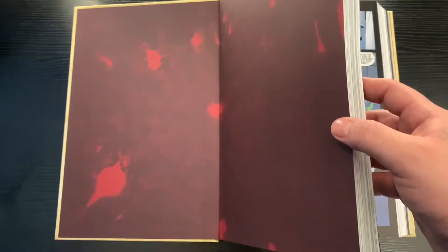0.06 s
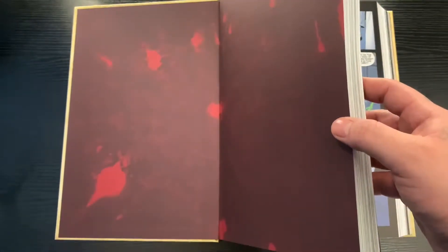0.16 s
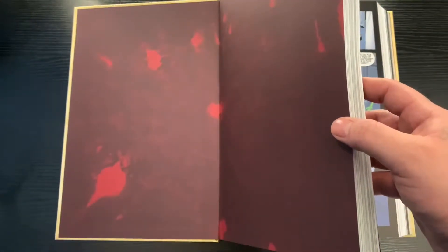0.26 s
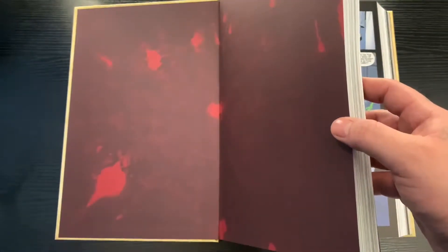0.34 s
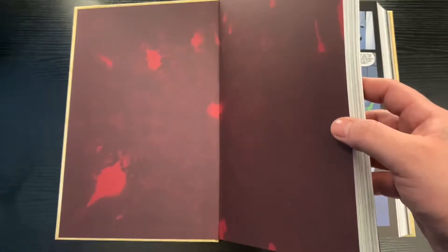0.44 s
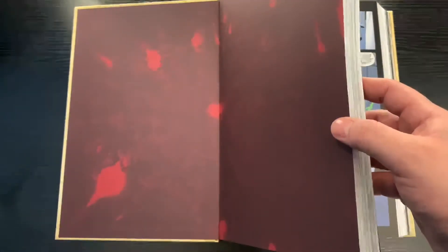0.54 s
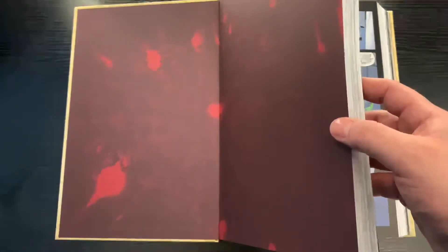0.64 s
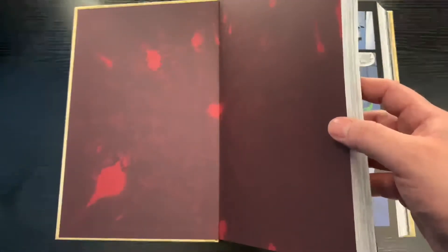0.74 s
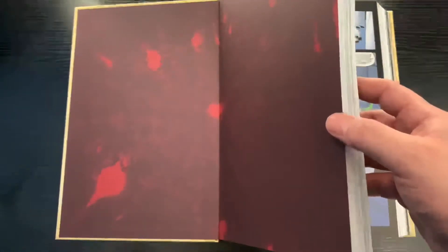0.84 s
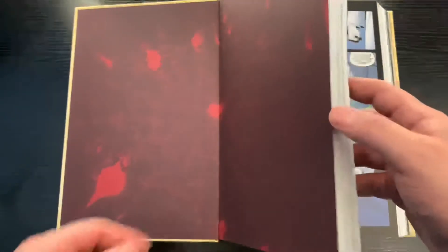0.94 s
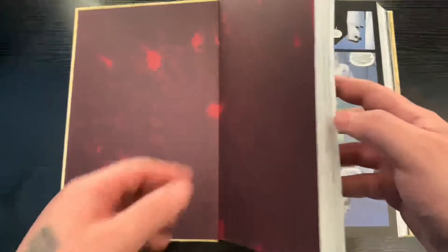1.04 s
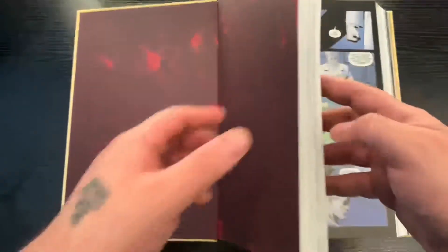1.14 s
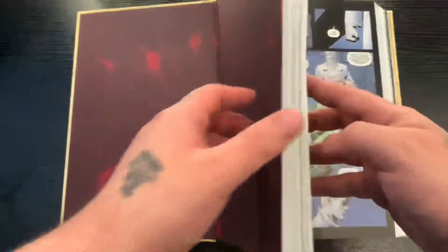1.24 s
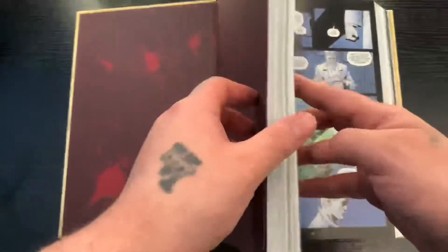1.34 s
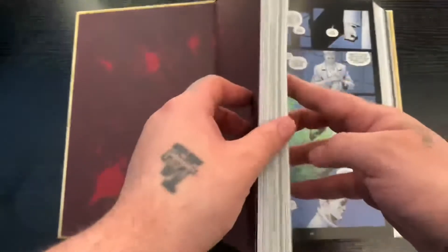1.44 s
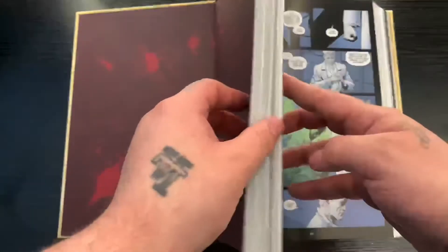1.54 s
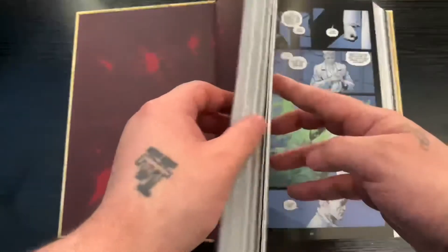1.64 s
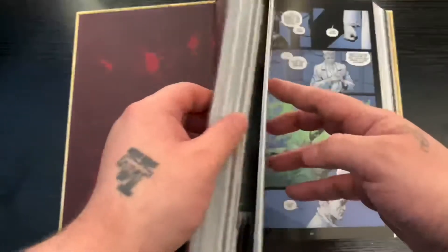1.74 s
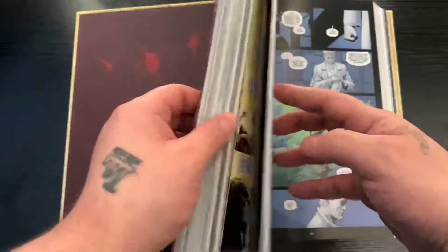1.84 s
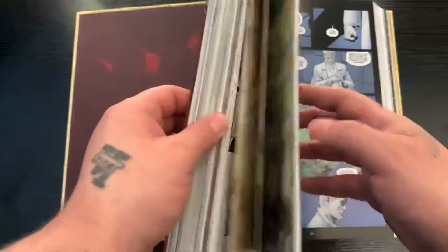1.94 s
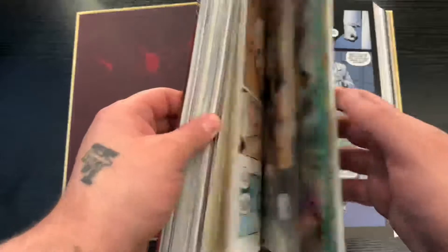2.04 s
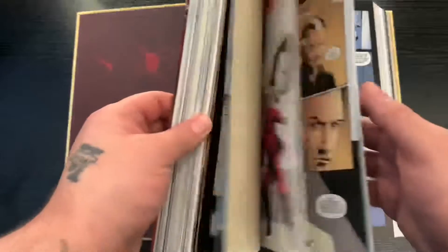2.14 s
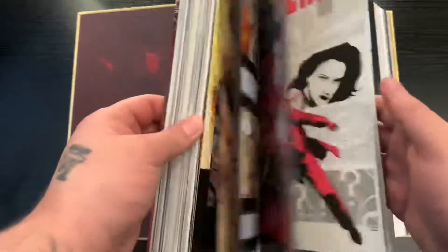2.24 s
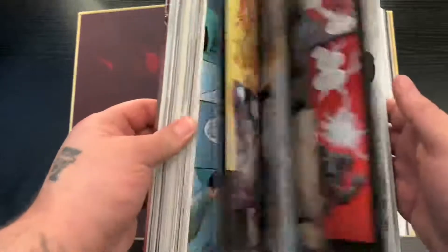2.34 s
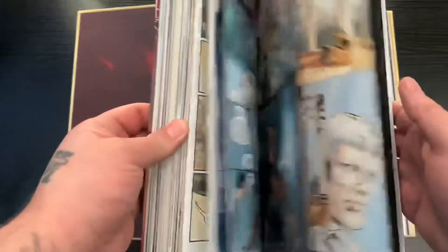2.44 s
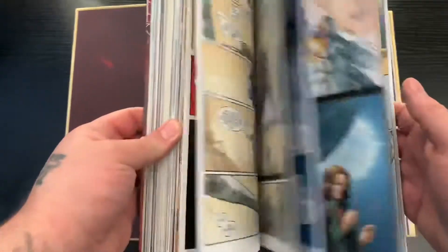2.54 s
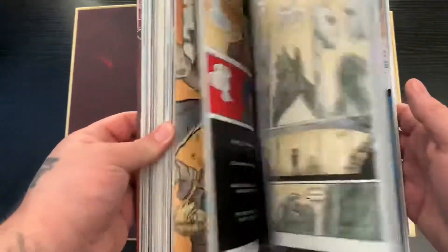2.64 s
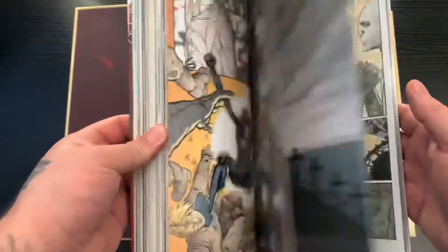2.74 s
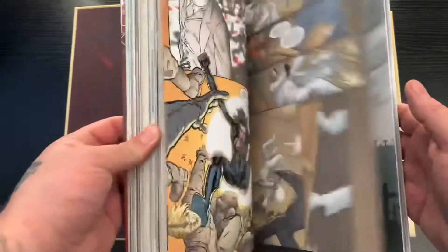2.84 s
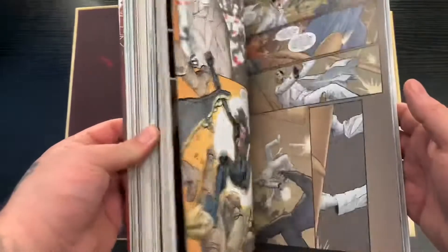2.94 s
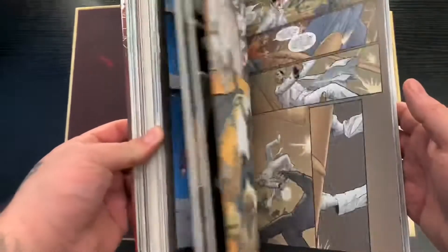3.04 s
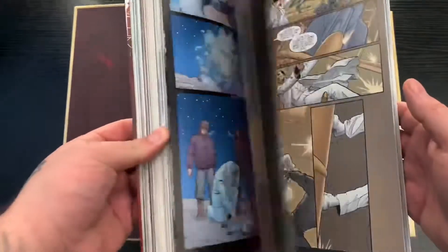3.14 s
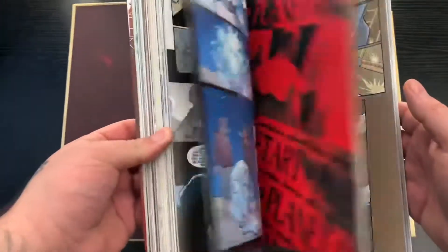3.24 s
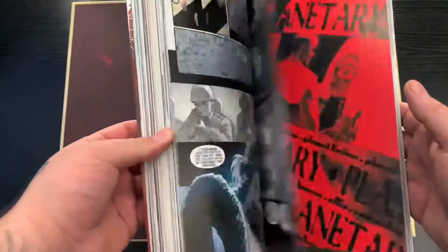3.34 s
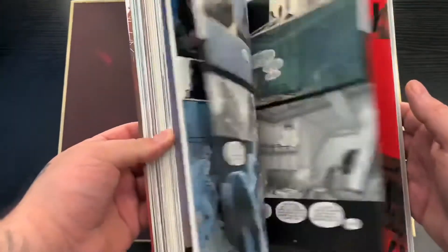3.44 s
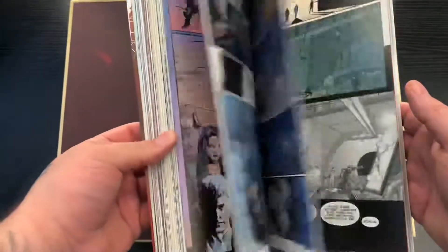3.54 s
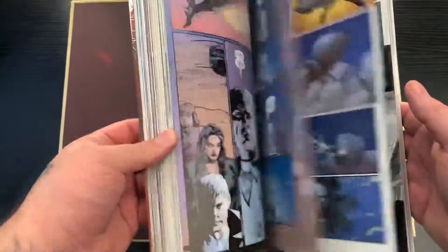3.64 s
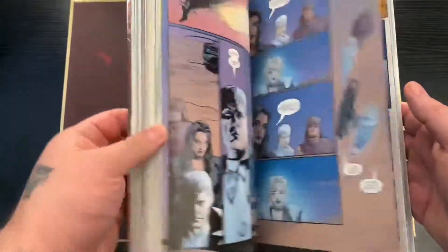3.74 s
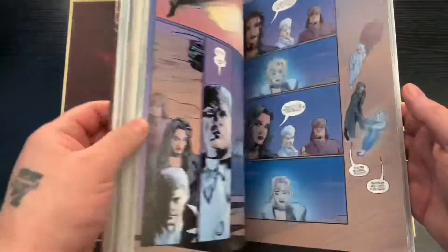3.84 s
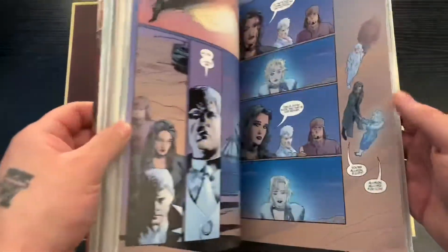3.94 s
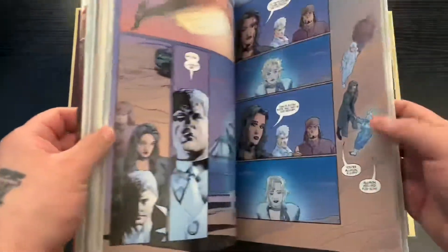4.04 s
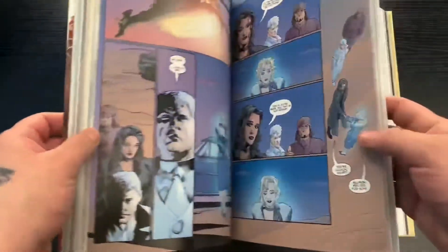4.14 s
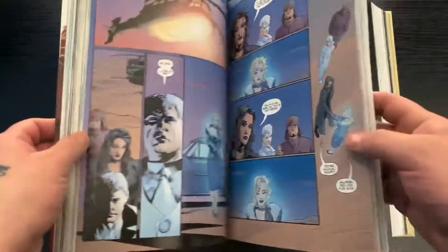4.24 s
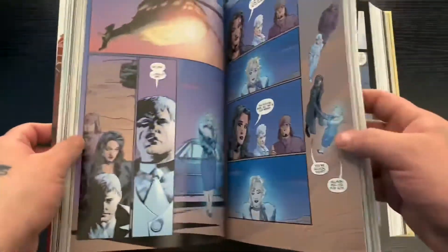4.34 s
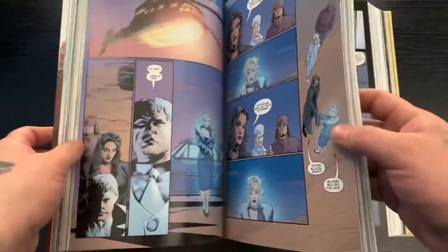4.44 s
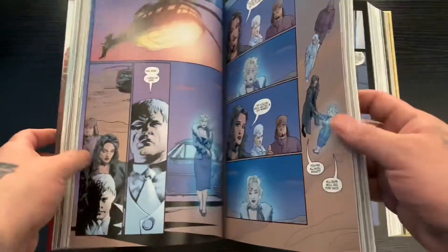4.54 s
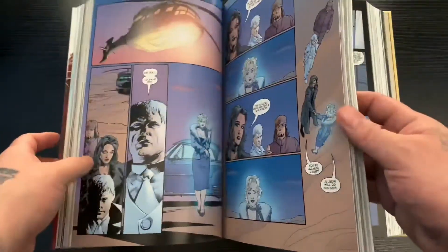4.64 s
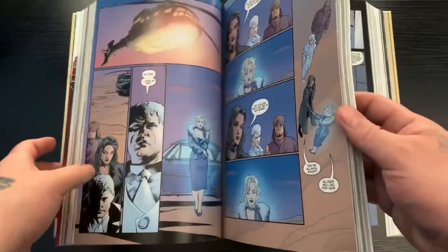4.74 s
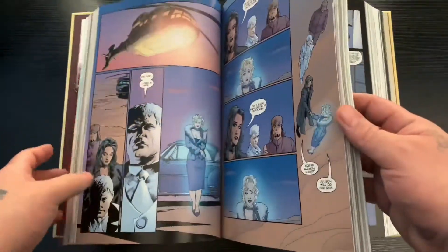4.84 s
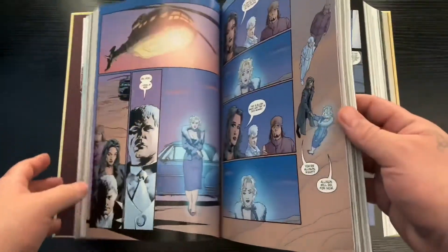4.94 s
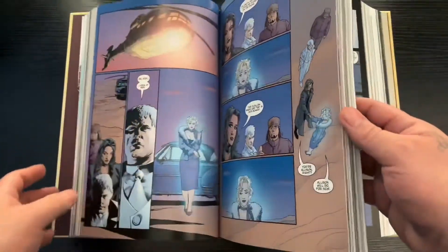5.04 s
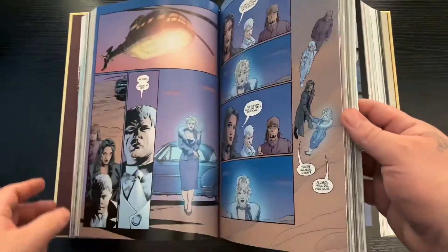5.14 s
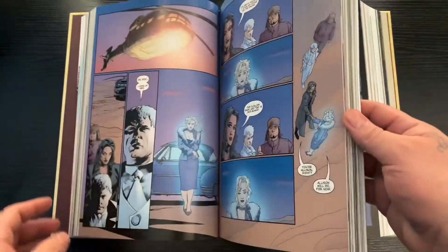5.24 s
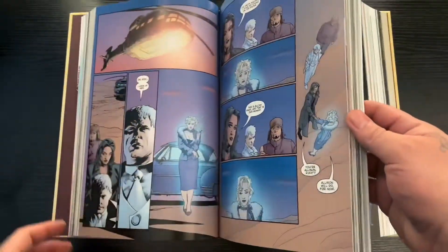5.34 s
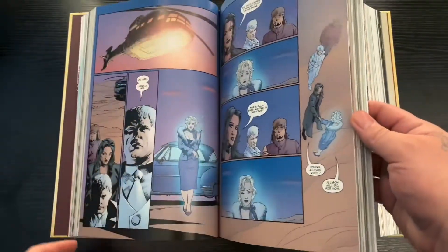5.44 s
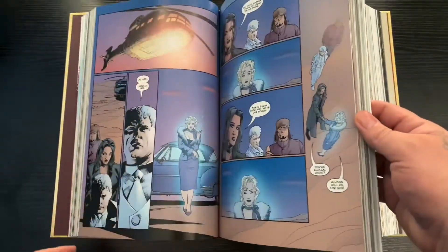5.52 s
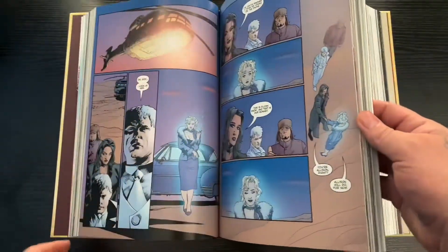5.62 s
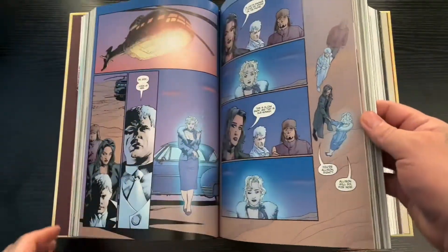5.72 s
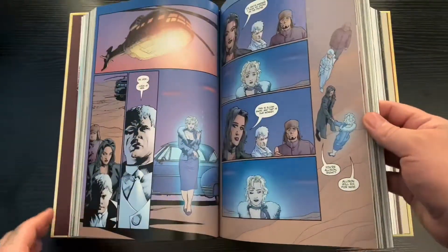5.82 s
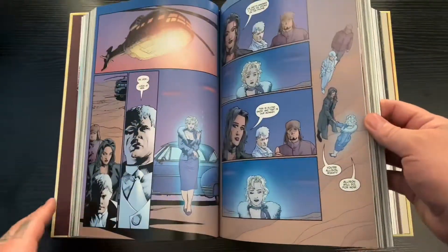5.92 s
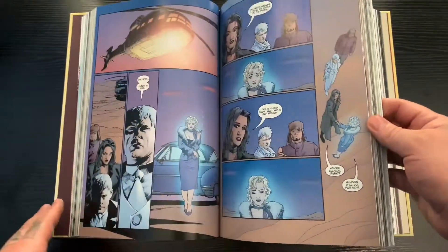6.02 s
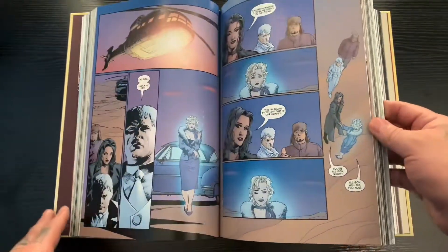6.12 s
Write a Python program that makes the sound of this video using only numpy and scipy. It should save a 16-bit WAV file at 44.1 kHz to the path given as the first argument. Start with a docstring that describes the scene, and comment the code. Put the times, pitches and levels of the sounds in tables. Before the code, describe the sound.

Low fan hum and soft room air come first. A hardcover raps the desk, hollow and dry with loose pages shuddering. Bright, irregular page flicks run together, thin out, and end in one loud whip-like crack. The book then lands in bumpy knocks, paper hisses under the hands, a brief low stuttering rub settles it, and faint finger touches follow. Close microphone, small room, short reverberation.

```python
"""In a small, quiet room, a thick hardcover comic is leafed through on a wooden desk.
The stiff cover knocks on the desk: decaying modes of the wood, a dry crack and a shudder of loose pages.
Glossy pages flick off the thumb as short noise bursts with a ring, and land with soft puffs of air.
Sheets slide with coloured noise, and the page block settles with a short stick-slip rub that falls in pitch.
A fan hums faintly: wavering sines and narrow noise peaks over soft air noise."""
import sys
import numpy as np
from scipy import signal
from scipy.fft import rfft, irfft, next_fast_len
from scipy.io import wavfile

SR = 44100
rng = np.random.default_rng(int(sys.argv[2]) if len(sys.argv) > 2 else 0)


def materialize(psi):
    """Save the field psi as 16-bit PCM at rate SR to the path in sys.argv[1].

    A 1-D psi becomes a single channel; in a 2-D psi each row is a channel.
    """
    bounded = np.clip(np.atleast_2d(psi).T, -1, 1)
    quanta = np.round(bounded * 32767).astype(np.int16)
    wavfile.write(sys.argv[1], SR, quanta)


N = 272538
TIME = np.arange(N) / SR
CUTOFF_HZ = 16000

# page edges leaving the thumb: start_s, level_db, ring_hz, earlier_catches (rounded to a whole number)
PAGE_FLICKS = [(1.784, -63, 7400, 0), (1.8405, -56, 7400, 0), (1.864, -63, 9000, 0),
               (1.954, -54, 4580, 1.5), (1.9645, -45.5, 4660, 0), (1.969, -46, 6900, 0),
               (2.027, -65, 5000, 0), (2.058, -50, 4700, 0.5), (2.069, -46.5, 5030, 0),
               (2.109, -54, 5500, 0), (2.147, -56, 5500, 1.5), (2.158, -43.5, 6500, 0),
               (2.211, -51, 11300, 0), (2.224, -48, 4500, 0), (2.238, -49.5, 7300, 0),
               (2.253, -42, 6070, 2), (2.294, -55, 4000, 0), (2.3051, -46, 5300, 0),
               (2.3365, -50, 6800, 0.5), (2.3462, -44, 7200, 0), (2.43, -48, 2790, 1.5),
               (2.439, -54, 6500, 0), (2.4524, -40, 10800, 0), (2.5082, -48, 5500, 0),
               (2.516, -50, 4700, 0.5), (2.5254, -43.5, 4710, 1), (2.73, -47, 6800, 0),
               (2.745, -59, 7000, -0.5), (2.757, -52, 4800, 0.5), (2.77, -66, 3200, 0),
               (2.831, -55, 10100, 0), (2.837, -56, 6800, 0), (2.9056, -47.5, 4140, 3),
               (3.032, -68, 9900, 0), (3.088, -58, 5000, 0.5), (3.109, -48, 4550, 0),
               (3.2596, -32, 9900, 0), (3.2936, -38.5, 6700, 0.5), (3.348, -48.5, 11500, 0.5)]


def from_db(db):
    """Decibels to amplitude ratio: 20 dB per factor of ten."""
    return 10 ** (np.asarray(db) / 20)


def rms_one(x):
    """Normalization to unit mean power."""
    return x / np.sqrt(np.mean(x ** 2) + 1e-20)


def at_hz(points, hz, axis=1):
    """Linear interpolation of a table column along logarithmic frequency."""
    points = np.array(points)
    return np.interp(np.log(np.maximum(hz, 1)), np.log(points[:, 0]), points[:, axis])


def butter(x, hz, kind, order=2):
    """Causal filtering with a maximally flat (Butterworth) passband."""
    return signal.sosfilt(signal.butter(order, hz, kind, fs=SR, output="sos"), x + 1e-18)


def flutter(per_s):
    """Random modulation: lines joining Gaussian knots of spread 1; the last of 4096 knots is held."""
    knots = rng.standard_normal(4096)
    return np.interp(TIME * per_s, np.arange(len(knots)), knots)


def noise(spectrum, size=N):
    """Diffuse-field noise: shaped stereo noise of rms 1 whose ears agree most in the bass."""
    # left-right likeness of diffuse sound: frequency_hz, correlation
    likeness = [(60, 0.99), (130, 0.78), (290, 0.64), (640, 0.081), (1400, 0), (16000, 0)]
    padded = next_fast_len(size, True)
    hz = np.fft.rfftfreq(padded, 1 / SR)
    alike = np.clip(at_hz(likeness, hz), -1, 1)
    mid, side = rfft(rng.standard_normal((2, padded)))
    bass_cut = np.minimum(hz / spectrum[0][0], 1) ** 2
    gain = from_db(at_hz(spectrum, hz)) * bass_cut
    stereo = np.sqrt(1 + alike) * mid + np.sqrt(1 - alike) * side * [[1], [-1]]
    return rms_one(irfft(gain * stereo, padded)[:, :size])


def place(x, lag_s, pan_db):
    """Localization by interaural time and level: lag_s delays the right, pan_db is left minus right."""
    right = np.interp(TIME - lag_s, TIME, x)
    return np.array([x * from_db(pan_db / 2), right * from_db(-pan_db / 2)])


def envelope(start_s, length_s, attack_s, release_s):
    """Linear attack, steady hold, then exponential decay by 1/e per release_s."""
    age = TIME - start_s
    return np.clip(age / attack_s, 0, 1) * np.exp(-np.clip((age - length_s) / release_s, 0, 30))


def rippled(spectrum, ripple_db):
    """Bending resonances: a bent sheet adds narrow random peaks and dips to a colour."""
    grid = np.geomspace(spectrum[0][0], 16000, 110)
    level_db = at_hz(spectrum, grid) + ripple_db * rng.standard_normal(len(grid))
    return np.column_stack([grid, level_db])


def room_tone(air_db=-60.5, peak_half_width=0.022):
    """Broadband air noise, wavering fan tones and narrow resonances of the fan's housing."""
    # colour of the air noise: frequency_hz, density_db per Hz
    air = [(25, -22), (60, -3.5), (110, -10), (150, -12), (200, -14.5), (300, -16), (500, -22),
           (820, -25.5), (1150, -20), (1900, -31.5), (2900, -40.5), (6000, -50), (9500, -46),
           (16000, -50.5)]
    # fan tones: frequency_hz, level_db
    fan_tones = [(73, -72), (146, -66)]
    # housing resonances: frequency_hz, level_db
    housing_peaks = [(295, -73.5), (580, -76), (1130, -74), (1245, -82), (2080, -87.5)]
    waver = from_db(2 * flutter(14))
    hum = sum(np.sqrt(2) * from_db(db) * np.sin(2 * np.pi * hz * TIME + .5 * flutter(14))
              for hz, db in fan_tones)
    draught = noise(air)
    housing = 0
    for hz, db in housing_peaks:
        band_hz = [hz * (1 - peak_half_width), hz * (1 + peak_half_width)]
        housing = housing + from_db(db) * rms_one(butter(draught, band_hz, "band"))
    return from_db(air_db) * noise(air) + waver * hum + housing


def room(x, first_wall_s=0.0032):
    """Reverberation: diffuse reflections decay exponentially at a rate set for each band."""
    # reverberation: frequency_hz, level_db, t60_s
    decay = [(70, 4.5, 0.26), (130, 1, 0.35), (330, 4, 0.31), (530, -5, 0.12), (680, -1.5, 0.24),
             (1190, 0, 0.28), (4000, 3, 0.18), (14000, 0.5, 0.17)]
    size = SR // 2
    age = TIME[:size]
    white = noise([(20, 0), (20000, 0)], size=size)
    tail = 0
    edges = np.geomspace(50, 18000, 10)
    for low, high in zip(edges, edges[1:]):
        hz = np.sqrt(low * high)
        level_db = at_hz(decay, hz) - 60 * age / at_hz(decay, hz, axis=2)
        tail = tail + butter(white, [low, high], "band") * from_db(level_db)
    # silent until first_wall_s, full at twice that; unit energy
    tail = rms_one(tail * np.clip(age / first_wall_s - 1, 0, 1)) / np.sqrt(size)
    return signal.fftconvolve(x, tail, axes=1)[:, :N]


def walls(x):
    """Specular reflection: two near surfaces return discrete delayed echoes of the left signal."""
    # first reflections: delay_s, level_db, left_minus_right_db, right_lag_s
    reflections = [(.0182, -11.5, -3.5, 0.00041), (0.0292, -17, -3, 0.00052)]
    return sum(from_db(db) * place(np.interp(TIME - delay_s, TIME, x[0]), lag_s, pan_db)
               for delay_s, db, pan_db, lag_s in reflections)


def slide_level(follows, glossy, creep_db):
    """Friction noise grows with speed: power sum of strokes, page swishes and creep for one colour."""
    # bent pages creeping under the hands that hold them: time_s, level_db (before creep_db)
    creep = [(1.4, -71), (1.56, -75), (1.78, -71.5), (2.2, -68.5), (3.09, -83.5), (3.56, -92), (4.14, -66),
             (4.26, -66), (4.58, -69.5), (4.84, -72), (5.0, -63.5), (5.1, -92)]
    # strokes of paper on paper and under fingers: start_s, length_s, level_db (before follows),
    # gloss_db (before glossy), swell_share of the length
    strokes = [(0.745, .025, -80, -4, .5), (1.11, 0.15, -78.5, -6, 0.34), (1.458, 0.23, -92.5, -16, 0.55),
               (2.283, 0.028, -67, 6, .5), (2.743, 0.032, -69.5, -8, .4), (2.80, 0.11, -73.5, 0, 0.98),
               (3.648, 0.086, -75, -2, 0.64), (3.822, 0.065, -73.5, -20, 0.59),
               (3.915, 0.047, -78.5, -17, 0.69), (4.02, .21, -65.5, -5, 0.44),
               (4.293, 0.11, -64.5, -4, 0.73), (4.39, 0.049, -62.5, -1.5, 0.59),
               (4.526, 0.025, -56.5, 2.5, 0.73), (4.552, .065, -62.5, 0, 0.25), (4.63, 0.16, -75, 3, 0.47),
               (4.74, 0.046, -58, -4, 0.65), (4.789, 0.014, -51.5, -8, 0.52),
               (4.855, 0.074, -48.5, -1, 0.42), (4.953, 0.035, -59.5, 3, .6), (5.09, .078, -80.5, 12.5, .6),
               (6.05, .098, -81, 12, 0.48)]
    middling_db, release_s = -65.5, 0.023
    riffle_end_s = 2.53   # until then pages leave in close succession
    # each page brushes its neighbour as it leaves; swish_db is relative to its flick
    swish_db, lead_s, swish_s, swish_swell = -29.5, 0.045, 0.045, 0.75
    power = from_db(creep_db + np.interp(TIME, *np.transpose(creep), left=-200, right=-200)) ** 2
    swishes = [(s - lead_s, swish_s, db + swish_db, 0, swish_swell)
               for s, db, hz, catches in PAGE_FLICKS if s < riffle_end_s]
    for s, length_s, db, gloss_db, swell in strokes + swishes:
        peak = from_db(middling_db + follows * (db - middling_db) + glossy * gloss_db)
        power = power + (peak * envelope(s, length_s, swell * length_s, release_s)) ** 2
    return np.sqrt(power)


def fibres(level, spread_db=3.0, snags_per_s=260, grit_db=-3):
    """Asperity contact: single fibres snag at random, each impulse a fine grit in one band."""
    # band of the snagging fibres: low_hz, high_hz
    grit_hz = [3000, 6800]
    happens = rng.random(N) < snags_per_s / SR
    strength = from_db(spread_db * np.minimum(rng.exponential(1, N), 3))
    snags = happens * strength * rng.choice([-1, 1], N)
    rings = butter(butter(snags, grit_hz, "band"), grit_hz, "band")
    return from_db(grit_db) * level * place(rms_one(rings), lag_s=.0001, pan_db=-2.5)


def slides(brush_db=3, hiss_db=-1.46, sheen_db=-4.0, grain_db=2.5, patchy_db=1.5,
           ripple_db=4.0, bends_per_s=12):
    """Sliding friction: faster strokes are brighter, and the colour shifts as the sheets bend."""
    # low, middle and top colours of sliding paper: frequency_hz, density_db per Hz
    brush = [(400, 10), (700, 1.5), (1400, 4.5), (2500, -2), (3400, -12), (4500, -13.5), (7000, -38.5)]
    hiss = [(2500, -7.5), (3600, 1), (4400, 3), (5200, -0.5), (5900, -3), (7200, -1.5), (8500, -35),
            (11000, -24)]
    sheen = [(6500, -24), (8500, -6), (10200, -2.5), (11300, -6.5), (13400, -5), (14300, -16),
             (15600, -11.5)]
    speed = slide_level(0.92, glossy=0, creep_db=-12)
    brush_level = slide_level(0.35, glossy=-0.29, creep_db=-0.5)
    sheen_level = slide_level(1.25, glossy=1.0, creep_db=-7.0)
    out = fibres(speed)
    for colour, trim_db, level in [(brush, brush_db, brush_level), (hiss, hiss_db, speed),
                                   (sheen, sheen_db, sheen_level)]:
        bend = flutter(bends_per_s)
        paper = np.cos(bend) * noise(rippled(colour, ripple_db))
        paper = paper + np.sin(bend) * noise(rippled(colour, ripple_db))
        out = out + level * from_db(trim_db + patchy_db * flutter(60)) * paper
    return out * rms_one(from_db(grain_db * flutter(900)))


def rub(jitter=.21, body_hz=520, rough_db=1.5, release_s=0.0046):
    """Stick-slip oscillation: the sagging page block makes a sawtooth that slows as it comes to rest."""
    start_s, attack_s, length_s = 4.875, 0.012, 0.067
    start_db, fade_db_per_s = -42, 49
    fast_hz, slow_hz, slows_at_s, slowing_s = 420, 115.3, .029, 0.012   # slip rate before jitter
    age = np.maximum(TIME - start_s, 0)
    per_s = slow_hz + (fast_hz - slow_hz) * (1 - np.tanh((age - slows_at_s) / slowing_s)) / 2
    cycles = np.cumsum(per_s * np.exp(jitter * flutter(250))) / SR
    saw = rms_one(butter(cycles % 1 - .5, body_hz, "low", order=4))
    level = from_db(start_db - fade_db_per_s * age + rough_db * flutter(200))
    shape = envelope(start_s, length_s, attack_s, release_s)
    return place(saw * level * shape, lag_s=.00005, pan_db=-0.5)


def flaps(fall_s=0.0025):
    """Flat impact: a sheet meets the next all over at once, a brief slap of band-shaped noise."""
    # slaps of sheet on sheet: centre_s, level_db, centre_hz
    slaps = [(2.333, -39.5, 930), (2.433, -58, 2600), (2.527, -47, 895), (2.642, -52, 950),
             (2.769, -61, 1380), (2.850, -50, 1160)]
    out, size = np.zeros((2, N)), SR // 10
    for s, db, hz in slaps:
        first = int(s * SR) - size // 2
        span = slice(first, first + size)
        slap = noise([(hz / 2, -8), (hz, 0), (hz * 1.33, -9), (hz * 1.2, -24), (15000, -55)], size=size)
        out[:, span] += from_db(db) * slap / np.cosh((TIME[span] - s) / fall_s)
    return out


def puffs(skirt_db=-22, landing_rasp_db=-40, nearness=0.35, flap_db=3.5):
    """Air displacement: a landing or pressed page expels its air cushion, a hollow puff over a thud."""
    # pages landing: centre_s, level_db, centre_hz, thud_db against the puff
    page_landings = [(2.333, -41.5, 870, 7), (2.431, -48.5, 670, 11), (2.523, -39.5, 780, 7),
                     (2.634, -48, 600, 1), (2.767, -52, 590, 3), (2.837, -45, 590, 3),
                     (3.268, -42.5, 543, 7), (3.459, -57, 330, 3.5), (3.643, -57.5, 340, -5),
                     (3.719, -60, 710, 5)]
    # fingers pressing: centre_s, level_db, centre_hz, half_length_s, thud_db and rasp_db against the puff
    touches = [(4.551, -45, 704, 0.0095, -6, -22), (4.831, -53, 485, .0078, -1, -28),
               (4.884, -50, 794, 0.012, -7, -22), (5.648, -54.5, 330, 0.0074, -15, -22),
               (5.845, -65.5, 650, 0.017, -1, -17), (6.17, -53, 430, 0.021, -5, -35)]
    hardest_half_s, doubling_db = 0.011, 15   # a landing doubling_db softer lasts twice as long
    touch_skirt_db = -9.5   # skin on paper is brighter than a cushion of air
    rasp_hz = 3030   # fingertip on a page edge
    out, size = np.zeros((2, N)), SR // 4
    hardest_db = max(row[1] for row in page_landings)
    events = []
    for s, db, hz, thud_db in page_landings:
        half_s = hardest_half_s * 2 ** ((hardest_db - db) / doubling_db)
        events.append((s, db, hz, half_s, thud_db, skirt_db, landing_rasp_db))
    for s, db, hz, half_s, thud_db, rasp_db in touches:
        events.append((s, db, hz, half_s, thud_db, touch_skirt_db, rasp_db))
    for s, db, hz, half_s, thud_db, top_db, rasp_db in events:
        first = int(s * SR) - size // 2
        span = slice(first, min(first + size, N))
        colour = [(70, thud_db), (hz * 0.33, -8), (hz, 0), (hz * 1.24, -7), (hz * 1.85, top_db),
                  (rasp_hz, rasp_db), (5000, -42), (15000, -60)]
        air = noise(colour, size=size)
        air = rms_one(air + nearness * air[::-1])   # close by, so both ears hear much the same
        shape = 1 / np.cosh(1.36 * (TIME[span] - s) / half_s)
        out[:, span] += from_db(db) * air[:, :span.stop - first] * shape
    return out * rms_one(from_db(flap_db * flutter(300)))   # the sheet flaps, so air leaves unevenly


def whip(pan_db=0.0):
    """Impulsive release: a stiff sheet whips taut, a sudden broad crack that decays exponentially."""
    # the whip: start_s, level_db, fall_s to 1/e
    release = (3.2598, -25, 0.0027)
    # colour of its crack: frequency_hz, density_db per Hz
    colour = [(400, 3), (1000, -0.5), (2000, -2.5), (3400, 1.5), (4700, 1), (7000, -6), (8700, 3),
              (10500, 0.5), (15000, -9)]
    s, db, fall_s = release
    shape = (TIME > s) * np.exp(-np.abs(TIME - s) / fall_s)
    return from_db(db) * shape * noise(colour) * from_db([[pan_db / 2], [-pan_db / 2]])


def crackle(spread_db=2.5, low_hz=2800, high_hz=7200, width=0.2, count=8):
    """Random buckling: a leaving page unbends in tiny snaps, each ringing in one of several bands."""
    level_db, per_s = -21, 1000   # level relative to the flick
    rise_s, fall_s, end_s = 0.0062, 0.006, 2.6
    bend = sum(from_db(db) * np.exp(np.minimum(TIME - s, 0) / rise_s - np.maximum(TIME - s, 0) / fall_s)
               for s, db, hz, catches in PAGE_FLICKS if s < end_s)
    happens = rng.random(N) < per_s / SR
    strength = from_db(spread_db * np.minimum(rng.exponential(1, N), 4))
    snaps = happens * strength * rng.choice([-1, 1], N)
    dealt = rng.integers(0, count, N)   # which band each snap rings in
    grains = 0
    for k, hz in enumerate(np.geomspace(low_hz, high_hz, count)):
        ring = butter(snaps * (dealt == k), [hz / (1 + width), hz * (1 + width)], "band")
        grains = grains + place(ring, .0001 * rng.standard_normal(), 0)
    return from_db(level_db) * bend * rms_one(grains)


def flicks(level_db=-1, ring_db=7, ring_octaves=0.147, fall_s=0.00073, rise_s=0.0015, hard_s=0.013,
           peak_s=0.0024, uneven=0.12, grain_db=2.5, pan_db=0.0):
    """Elastic release: an edge catches on the thumb, harder each time, then snaps free and rings."""
    # glossy paper: frequency_hz, density_db per Hz
    sheet = [(500, 1), (1500, -5), (3000, -1.5), (3800, -7), (4700, 5.5), (5900, -4.5), (6900, 1.5),
             (8000, -2.5), (9300, 6.5), (12400, -12), (13600, 3), (16000, -14)]
    catch_s, catch_loss_db = .0042, 4   # mean spacing of catches; each earlier one is this much weaker
    out, size = np.zeros((2, N)), SR // 12
    snaps = []
    for s, db, hz, catches in PAGE_FLICKS:
        for k in range(round(catches) + 1):
            earlier_s = k * catch_s * (1 + uneven * rng.uniform(-0.85, 1))
            snaps.append((s - earlier_s, db - k * catch_loss_db, hz))
    for s, db, hz in snaps:
        first = int(s * SR) - size // 2
        span = slice(first, first + size)
        grid, colour = rippled(sheet, ripple_db=3.5).T
        # the ring is a peak in the noise at the pitch set by the sheet's bend
        colour = colour + ring_db * np.exp(-(np.log2(grid / hz) / ring_octaves) ** 2)
        age = TIME[span] - s - peak_s
        hold_s = hard_s * from_db(db)   # a hard snap lets go of several sheets, one after another
        shape = np.exp(np.minimum(age, 0) / rise_s - np.maximum(age - hold_s, 0) / fall_s)
        burst = noise(np.column_stack([grid, colour]), size=size)
        out[:, span] += from_db(db + level_db) * shape * burst
    return out * from_db(grain_db * flutter(1500)) * from_db([[pan_db / 2], [-pan_db / 2]])


def knocks(load_cycles=1.0, crack_db=-15.5, crack_s=0.0091, crack_rise_s=0.00059, shudder_db=-21.5,
           shudder_s=0.028, shudder_rise_s=0.0044, vary_db=2.0, vary_share=0.011, lag_s=0.00028, pan_db=1.5):
    """Modal impact: the cover lands edge first, then flat, and each contact rings the desk's modes."""
    # contacts of the cover: start_s, level_db, second_db against the first, gap_s to the second,
    # crack_db against the knock, pitch_ratio of the modes, crack_top_hz (soft contacts are duller)
    contacts = [(1.1498, -15.5, -0.5, .00765, 0, 0.99, 9000), (1.2340, -24, -5, 0.01, 2, 1.03, 2200),
                (1.2896, -23, -5.5, 0.0083, 3, 1.02, 1900), (1.3257, -21, -18, .0075, -1.5, 1.04, 1500),
                (1.352, -31, -1.5, 0.0056, -7, 0.95, 1400), (4.0881, -12.5, -5.5, 0.0053, -1, .99, 6000),
                (4.1583, -17, .5, .0076, -3, 0.995, 6000), (4.2033, -16, -8, 0.0066, -1, 1.015, 3000),
                (4.2300, -23.5, -6, .0115, -6, 1.01, 2000), (4.872, -36.5, -0.5, .0085, 7, 0.91, 3000)]
    # modes of book on desk: frequency_hz, level_db, t60_s (pitch and level before variation)
    modes = [(62, -23, 0.32), (85.3, -27.5, 0.25), (129, -22.5, 0.15), (186.7, -27.5, 0.09),
             (302.8, -13.5, 0.076), (389.5, -15.5, 0.06), (516.6, 6, 0.038), (572, -18, 0.064),
             (624, -11.5, 0.076), (875, -22, 0.05), (1136, -24, 0.026), (1318, -17, .028),
             (1506, -31, .053), (1960, -36.5, .051)]
    # dry crack: frequency_hz, density_db per Hz
    crack_colour = [(200, -5), (600, 1), (1300, 6), (2100, -8.5), (4000, -23), (7000, -32.5),
                    (11000, -18.5), (16000, -25.5)]
    # shudder of the loose pages: frequency_hz, density_db per Hz
    shudder_colour = [(110, -7), (200, -10.5), (330, 1), (430, 3), (520, 1), (620, 5), (750, -28),
                      (2000, -20.5), (6000, -56)]
    # a lighter knock loads the desk less: below 200 Hz its modes are higher, and stronger for its level
    boom_rise_per_db, boom_keeps = 0.11, 0.4   # pitch ratio and dB added per dB below the hardest
    in_step_low_hz, in_step_high_hz = 450, 700   # close modes in this band start in step
    wood, shudders = np.zeros((2, N))
    cracks, size = np.zeros((2, N)), SR // 3
    hardest_db = max(row[1] for row in contacts)
    for s, db, second_db, gap_s, hard_db, pitch, top_hz in contacts:
        for start, gain in ((s, from_db(db)), (s + gap_s, from_db(db + second_db))):
            first = int(start * SR) + 1
            span = slice(first, first + size)
            age = TIME[span] - start
            for k, (hz, level, t60) in enumerate(modes):
                lighter_db = (hardest_db - db) * (hz < 200)
                sharper, louder = rng.standard_normal(2)
                cycles = age * hz * (pitch + boom_rise_per_db * lighter_db + vary_share * sharper)
                # each mode needs about a cycle to build, so the boom comes last
                load = 1 - np.exp(-(cycles / load_cycles) ** 2)
                sign = 1 if in_step_low_hz < hz < in_step_high_hz else (-1) ** k
                mode_db = level + vary_db * louder + boom_keeps * lighter_db - 60 * age / t60
                wood[span] -= sign * gain * load * from_db(mode_db) * np.sin(2 * np.pi * cycles)
            crack = noise(crack_colour, size=size) * np.tanh(age / crack_rise_s) * np.exp(-age / crack_s)
            crack = butter(crack, min(top_hz, CUTOFF_HZ), "low", order=1)
            cracks[:, span] += gain * from_db(crack_db + hard_db) * crack
            shudders[span] += (gain * np.tanh(age / shudder_rise_s) * np.exp(-age / shudder_s)) ** 2
    shudder = from_db(shudder_db) * np.sqrt(shudders) * noise(shudder_colour)[0]
    return cracks + place(wood + shudder, lag_s, pan_db)


def scene(knock_wet_db=-13, flick_wet_db=-9, soft_wet_db=-11):
    """Superposition: direct sound of book and hands, with wall echoes and reverberation behind."""
    wood = knocks()
    edges = flicks() + crackle() + whip()
    soft = puffs() + flaps() + rub()
    sent = from_db(knock_wet_db) * wood + from_db(flick_wet_db) * edges + from_db(soft_wet_db) * soft
    return wood + walls(wood) + edges + soft + slides() + room(sent) + room_tone()


def record(dry, left_bump_db=2.0, left_dip_db=-2.0):
    """Two-port pickup: the ports differ in colour, share the top treble and cut both band ends."""
    hz = np.fft.rfftfreq(2 * N, 1 / SR)
    left, right = rfft(dry, 2 * N)
    tilt = [(500, 0.01), (1050, left_bump_db), (2500, 0.0046), (5400, left_dip_db), (7000, 0.0049)]
    tilt_db = at_hz(tilt, hz)   # left minus right
    left, right = left * from_db(tilt_db / 2), right * from_db(-tilt_db / 2)
    # towards the top the left takes over the right signal, widened by a phase twist
    shared = np.clip((hz - 5500) / 2800, 0, 1)
    twist = np.exp(-2j * np.pi * (hz - 6450) / 4550)
    left = np.sqrt(1 - shared) * left + np.sqrt(shared) * twist * right
    wide = butter(irfft(np.array([left, right]))[:, :N], 19, "high")
    return signal.sosfilt(signal.ellip(10, .1, 80, CUTOFF_HZ, fs=SR, output="sos"), wide)


dry = scene()
out = record(dry)
materialize(out)
```